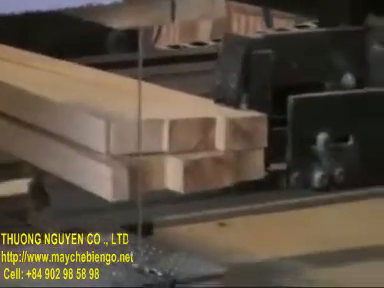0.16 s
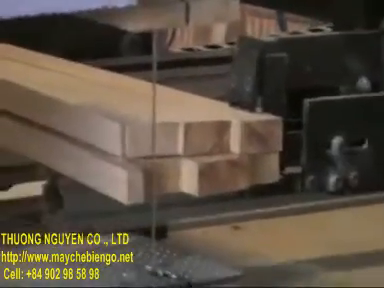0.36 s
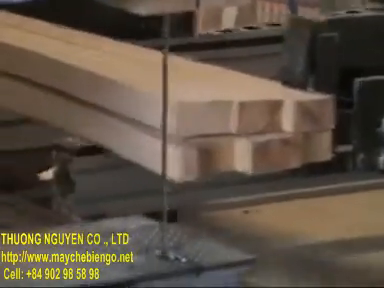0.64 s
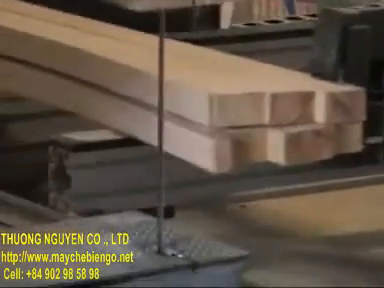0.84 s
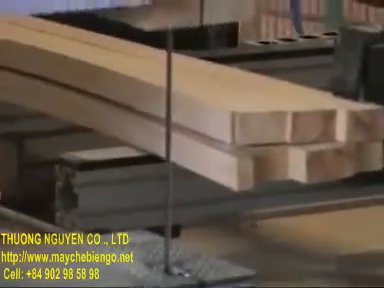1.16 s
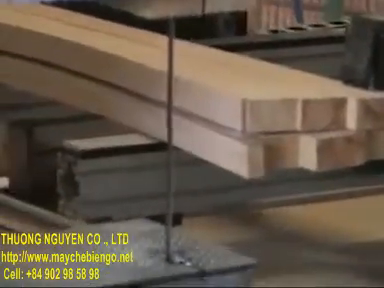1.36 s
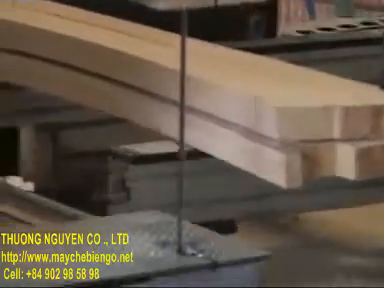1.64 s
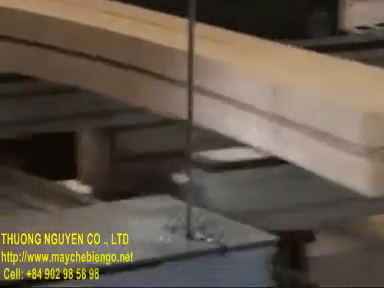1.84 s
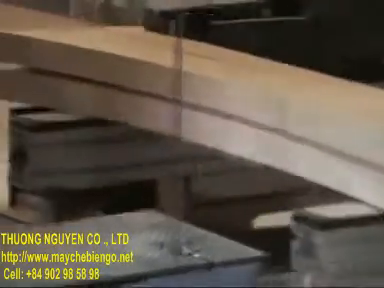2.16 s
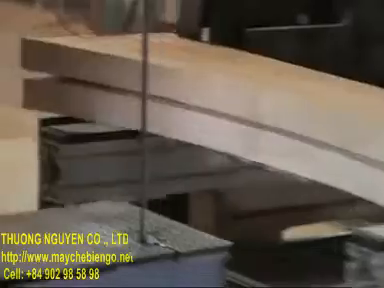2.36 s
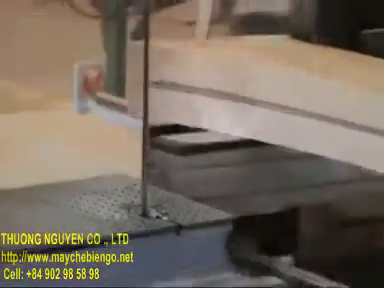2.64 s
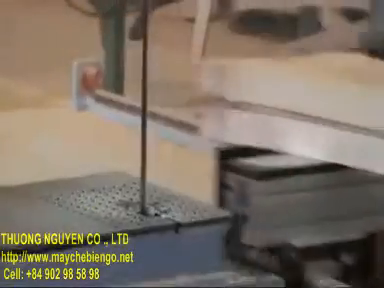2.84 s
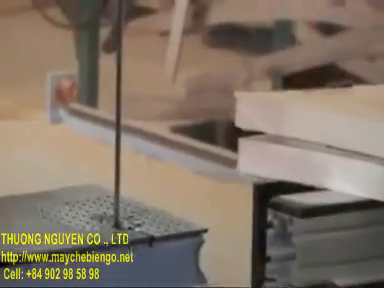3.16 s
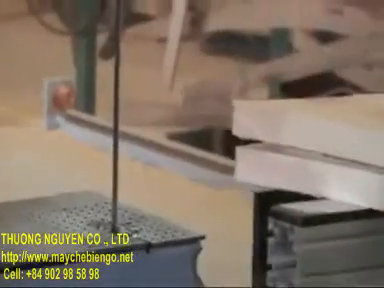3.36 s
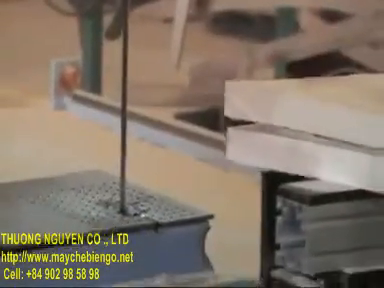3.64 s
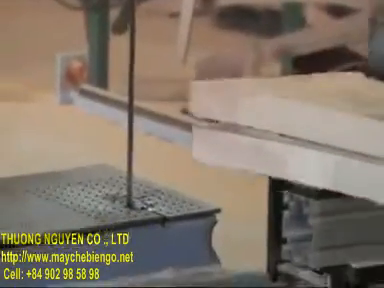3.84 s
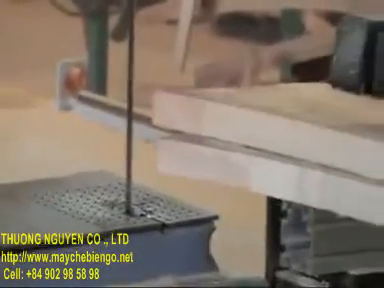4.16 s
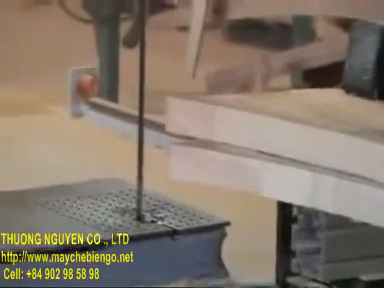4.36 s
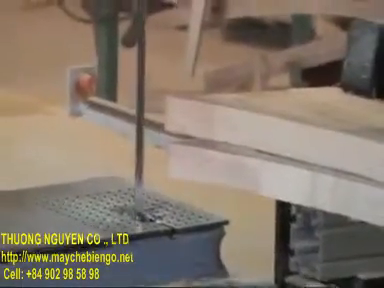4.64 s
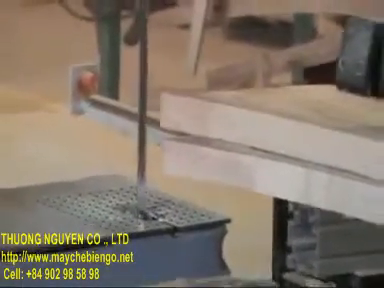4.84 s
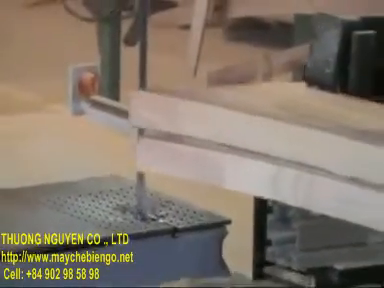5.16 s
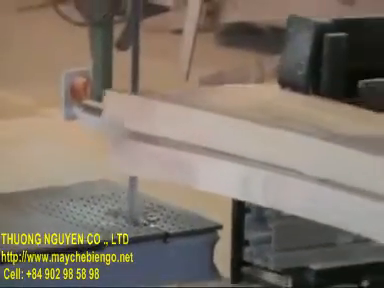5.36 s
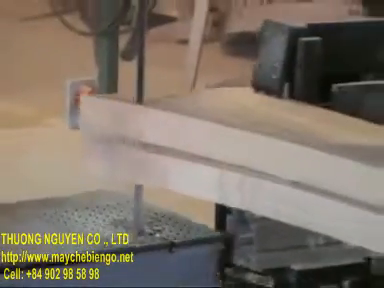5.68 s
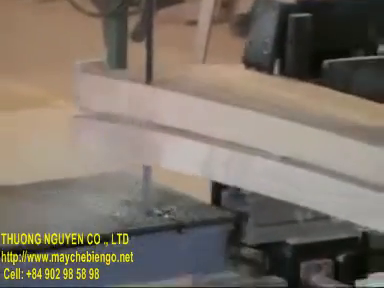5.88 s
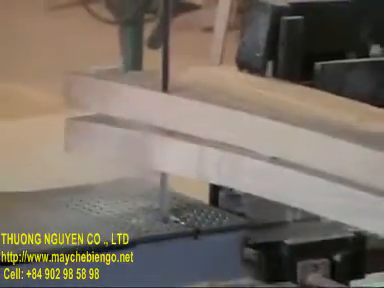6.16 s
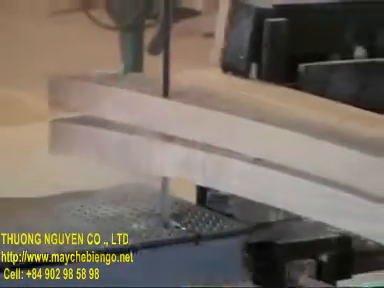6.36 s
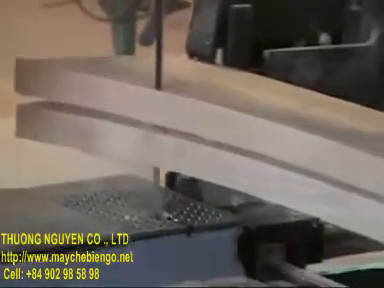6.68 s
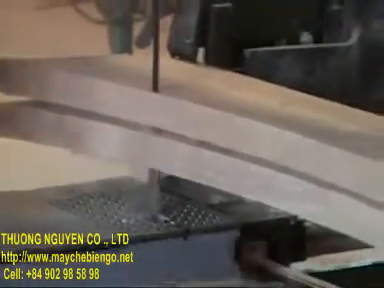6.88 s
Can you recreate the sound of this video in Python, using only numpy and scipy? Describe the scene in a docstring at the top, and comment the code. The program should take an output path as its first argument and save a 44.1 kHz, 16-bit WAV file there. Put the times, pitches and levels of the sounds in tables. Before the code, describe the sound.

A running industrial saw fills most of the time with broadband roar and hiss, faint low thuds, brief scrapes and a wavering, very high whine. Then wood meets the blade: a sudden metallic squeal, followed by a bright, gritty sawing screech that pulses irregularly and builds as the cut deepens, still going at the end. Close camera microphone in a workshop, slight stereo width in the treble, with automatic level control squeezing the background.

```python
"""A big band saw cuts a stack of boards: from 5.3 s the blade squeals, then its teeth rasp in surges, louder
as the slot deepens. The cut is built from harmonics of the tooth rate and noise pulsing at that rate.
Behind it blade, wheels and dust extraction roar as noise shaped by resonances, with rumble, hums and scrapes,
and a motor whistles with partials locked to its shaft speed, which sags and recovers.
The camera's gain control pushes the roar down as the cut grows."""
import sys
import numpy as np
from scipy import signal
from scipy.fft import rfft, irfft, next_fast_len
from scipy.io import wavfile
from scipy.ndimage import map_coordinates

SR = 44100
rng = np.random.default_rng(int(sys.argv[2]) if len(sys.argv) > 2 else 0)


def file_out(sig):
    """Save sig as 16-bit WAV at sys.argv[1]."""
    # one column per channel
    cols = np.atleast_2d(sig).T
    # limit, then scale
    lim = np.clip(cols, -1, 1)
    pcm = np.round(lim * 32767).astype(np.int16)
    wavfile.write(sys.argv[1], SR, pcm)


N = 309141  # length in samples


def amp(db):
    """Logarithmic level: decibels to linear gain."""
    return 10 ** (np.asarray(db) / 20)


def unit(x):
    """Normalisation: x scaled to rms 1."""
    return x / np.sqrt(np.mean(x ** 2) + 1e-20)


def clock():
    """Sampling: the time of every sample, in seconds."""
    return np.arange(N) / SR


def along(points, hz):
    """Logarithmic frequency scale: (f/Hz, value) points interpolated on a log axis."""
    f, v = np.transpose(points)
    return np.interp(np.log(hz + 1), np.log(f + 1), v)


def curve(rows):
    """Linear interpolation: (t/s, value) rows as one value per sample."""
    t, value = np.transpose(rows)
    return np.interp(clock(), t, value)


def wobble(rate):
    """Band-limited randomness: a smooth curve through rate random knots a second."""
    knots = rng.standard_normal(int(N * rate / SR) + 4)
    return map_coordinates(knots, [np.arange(N) * rate / SR])


def bell(x, middle, width):
    """Gaussian window: a bump of height 1 and the given full width at half height."""
    return np.exp2(-np.minimum((2 * (x - middle) / width) ** 2, 60))


def filtered(x, response):
    """Linear filtering: the spectrum of x times a response of frequency."""
    m = next_fast_len(N + SR // 4)
    return irfft(rfft(x, m) * response(np.fft.rfftfreq(m, 1 / SR)), m)[..., :N]


def turning(hz):
    """Phase accumulation: the running sum of a frequency, in radians."""
    return 2 * np.pi * np.cumsum(hz) / SR


def noise(spectrum):
    """Subtractive synthesis: two unrelated noises of one colour, falling away outside its ends."""
    closed = [(spectrum[0][0] / 2, -120), *spectrum, (spectrum[-1][0] * 2, -120)]
    return unit(filtered(rng.standard_normal((2, N)), lambda hz: amp(along(closed, hz))))


def tone(phase, rough, rate):
    """Random modulation: a tone of rms about 1, as a quadrature pair; the share rough of its power flutters."""
    rough = np.clip(rough, 0, 1)
    flutter = wobble(rate) + 1j * wobble(rate)
    z = np.exp(1j * phase) * (np.sqrt(2 * (1 - rough)) + np.sqrt(rough) * flutter)
    return np.array([z.real, z.imag])


# low spectrum of the shaking base: f/Hz, relative level/dB
BASE_SPECTRUM = [(40, -5), (62, -7), (78, -7), (100, 6), (125, -22)]
# dull thuds in the machine's base: middle t/s, level/dB
THUDS = [(0.98, -51), (1.42, -50), (1.56, -50), (2.1, -52), (3.09, -51), (3.78, -53), (4.02, -50),
         (4.22, -48), (4.85, -51), (5.0, -51), (5.13, -49)]
THUD_HZ, THUD_S = 80, 0.045


def rumble():
    """Amplitude-modulated low noise: the base shakes unevenly and now and then thuds."""
    body = noise(BASE_SPECTRUM)
    thud_gain = sum(amp(db) * bell(clock(), s, THUD_S) for s, db in THUDS)
    thuds = thud_gain * tone(turning(np.full(N, THUD_HZ)), rough=0.25, rate=32)
    shaking = unit(amp(5.5 * wobble(16)) * body)
    return amp(-64.0) * shaking + thuds


# narrow resonances of the frame and guards: f/Hz, lift/dB
FRAME_RESONANCES = [(291, 1.6), (345, 4.3), (409, 1.8), (474, 1.5), (614, 2.2), (678, 3.0), (861, 2.2),
                    (1001, 3.8), (1109, 1.4), (1227, 3.1), (1249, 2.7), (1292, 2.9), (1389, 2.1),
                    (1723, 2.9), (1873, 2.8), (2003, 1.6), (2315, 2.0), (2379, 1.7), (2455, 2.1),
                    (2519, 2.5)]


def housing(hz, width_hz, ripple_db):
    """Resonance and interference: the frame's peaks, and fine ripple from nearby walls, weaker in the treble."""
    ripple = map_coordinates(rng.standard_normal(2000), [hz / 14], mode="wrap")
    ripple = ripple / (1 + (hz / 5000) ** 2)
    peaks_db = sum(db * bell(hz, centre, width_hz) for centre, db in FRAME_RESONANCES)
    return amp(peaks_db + ripple_db * ripple)


# spectra of roar, hiss and rattle: f/Hz, relative level/dB
ROAR_SPECTRUM = [(15, -72), (25, -63), (140, -13.5), (183, -16), (224, -5.5), (283, -5.5), (316, -7.5),
                 (340, -3), (372, -5.5), (575, -4), (676, -3), (872, -1.5), (1160, -6), (1250, -6.5),
                 (1900, -11), (2470, -28), (4180, -120)]
HISS_SPECTRUM = [(940, -15.5), (1600, -4.5), (2010, -2), (2860, -2), (3090, -2.5), (3660, -3), (3940, -3),
                 (5960, -2), (7300, -4), (7870, -8), (8420, -9), (11000, -20.5), (12000, -51.5),
                 (15600, -65), (22000, -120)]
RATTLE_SPECTRUM = [(700, -13), (1200, -5.0), (1600, -2.0), (2400, -16.0), (3500, -25)]
# course of the machine's roar, before a constant lift: t/s, relative level/dB
ROAR_LEVEL = [(0.0, -24), (0.73, -23), (0.77, -28.5), (0.79, -24), (1.21, -24), (1.97, -22), (2.37, -23.5),
              (4.08, -23), (5.25, -24.5)]
# course of the guards' rattle: t/s, level/dB
RATTLE_LEVEL = [(0, -26), (.2, -29), (.45, -28), (1.0, -29), (1.2, -33.5), (1.6, -27.5), (1.9, -29.5),
                (2.08, -30), (2.45, -39), (2.9, -33), (3.1, -28), (3.5, -32), (3.8, -31.5), (4.1, -28.5),
                (4.6, -32), (5.2, -37), (5.7, -32), (7.0, -32)]
# nearly steady hums of the drive: f/Hz, level/dB
DRIVE_HUMS = [(343, -42), (477, -48), (604, -44), (619, -43.5), (678.3, -41.5), (838, -45.5), (1001, -40),
              (1226, -44), (1296, -43)]
HISS_DB = -19  # the blade running through the air


def machine():
    """Broadband noise through resonances: wheels and extraction roar, guards rattle, the blade hisses."""
    roar = unit(filtered(noise(ROAR_SPECTRUM), lambda hz: housing(hz, width_hz=16, ripple_db=1.1)))
    hiss = unit(filtered(noise(HISS_SPECTRUM), lambda hz: housing(hz, width_hz=16, ripple_db=1.3)))
    rattle = amp(curve(RATTLE_LEVEL) + 1.7 * wobble(20)) * noise(RATTLE_SPECTRUM)
    hum = sum(amp(db) * tone(turning(np.full(N, hz)), rough=0.19, rate=7) for hz, db in DRIVE_HUMS)
    roar = amp(curve(ROAR_LEVEL) + 2.0 + 0.09 * wobble(15)) * roar
    hiss = amp(HISS_DB + 0.53 * wobble(14)) * hiss
    return roar + hiss + rattle + hum


# single notes swell briefly: the frame sings on its resonances, and near 3.2 and 3.8 kHz the whistle's partials
# swell: middle t/s, f/Hz, level/dB, length/s
SWELLS = [(0.3, 872, -28, 0.45), (0.35, 1438, -32, 0.25), (0.45, 1112, -31, 0.3), (0.8, 1297, -31, 0.6),
          (0.88, 3192, -34, 0.35), (0.85, 428, -29, 0.35), (0.95, 1874, -31, 0.55), (1.08, 1728, -31, 0.4),
          (2.02, 679, -26, 0.3), (2.35, 835, -29, 0.3), (2.52, 3190, -31, 0.15), (3.122, 1386, -26, 0.16),
          (3.55, 857, -29, 0.14), (3.92, 1002, -28, 0.3), (4.3, 1232, -31, 0.25), (4.43, 3195, -29.5, 0.16),
          (5.0, 3821, -35, 0.35), (5.08, 835, -29, 0.35), (5.17, 3819, -33, 0.08), (5.52, 3822, -34, 0.25)]


def swells():
    """Phase-modulated tones in Gaussian windows: single wavering notes rise out of the roar and sink back."""
    t = clock()
    out = np.zeros(N, complex)
    for s, hz, db, length in SWELLS:
        near = np.abs(t - s) < 2 * length
        waver = .7 * wobble(40)[near]  # radians
        note = np.exp(1j * (2 * np.pi * hz * t[near] + waver))
        out[near] += amp(db) * bell(t[near], s, 1.46 * length) * note
    return np.array([out.real, out.imag])


# pitch of the whistle, which follows the shaft speed: t/s, f/Hz
WHISTLE_PITCH = [(0.38, 8075), (0.55, 8003), (1.08, 7962), (1.85, 8066), (2.13, 8072), (2.3, 8005),
                 (2.6, 7938), (3.2, 7942), (3.85, 7957), (4.2, 8005), (4.6, 7938), (5.08, 7902),
                 (5.9, 7936), (7.0, 7965)]
# course of the whistle, strongest while the shaft is dragged down: t/s, relative level/dB
WHISTLE_LEVEL = [(0.1, -35), (0.72, -31), (1.3, -32.5), (1.6, -40), (1.95, -40), (2.25, -28.5),
                 (2.75, -26.5), (3.2, -30), (3.8, -32), (4.1, -38), (4.4, -27.5), (5.1, -26.5), (5.5, -33),
                 (5.95, -29), (7.0, -33)]
# partials that turn with the whistle: share of its pitch, relative level/dB, resonance f/Hz, lift/dB
PARTIALS = [(1, 1.5, 7950, 0), (.958, -6, 7605, 4), (.768, -9, 6098, 6), (.65, -8, 5197, 11),
            (.6, -2, 4762, 2), (.568, -8, 4535, 8), (.558, -9, 4430, 8), (.4836, -7, 3820, 11.5),
            (.45, -7, 3591, 7), (.4, -6, 3199, 10)]
RESONANCE_Q = 100  # resonance frequency over the width of its lift


def motor():
    """Order tracking: a whistle and lower partials follow the shaft speed, swelling as they cross resonances."""
    pitch_hz = curve(WHISTLE_PITCH)
    phase = turning(pitch_hz)
    whistle = 0
    for share, level_db, centre, lift_db in PARTIALS:
        resonance_db = lift_db * bell(share * pitch_hz, centre, centre / RESONANCE_Q)
        whistle = whistle + amp(level_db + resonance_db) * tone(share * phase, rough=.33, rate=45)
    # nearly out of phase at the two ports: weak in the middle, strong at the sides
    mid_side_db = np.array([[-8], [-3.5]])
    return amp(curve(WHISTLE_LEVEL) + .8 * wobble(14) + mid_side_db) * whistle


# brief scrapes: middle t/s, centre f/Hz, bandwidth/Hz, level/dB, length/s
SCRAPES = [(1.68, 3334, 500, -28.5, 0.4), (2.07, 1700, 1200, -26, 0.11), (2.955, 2000, 1200, -22.5, 0.06),
           (3.08, 1500, 700, -27, 0.1), (4.09, 1600, 1300, -24.5, 0.08), (4.12, 800, 898, -28.5, 0.22),
           (4.34, 1350, 700, -29, 0.14), (5.323, 1215, 1298, -22.5, 0.073), (5.7, 1400, 1200, -27, 0.2),
           (5.79, 4500, 700, -26, 0.04), (5.82, 3680, 400, -25, 0.09), (5.952, 2700, 500, -23, 0.04),
           (5.95, 8100, 900, -26, 0.04), (6.23, 8300, 1500, -22, 0.025)]


def scrapes():
    """Friction noise: wood rubs on steel, and each rub swells in one narrow band."""
    t = clock()
    out = np.zeros(N, complex)
    for s, hz, width_hz, db, length in SCRAPES:
        grit = unit(wobble(width_hz)) + 1j * unit(wobble(width_hz))
        out += amp(db) * bell(t, s, length) * grit * np.exp(2j * np.pi * hz * t)
    return np.array([out.real, out.imag])


# the boards touch the blade, then are fed onto it at a steady speed
ENTRY_S, SLOT_OPENS_S, FEED_M_PER_S, SOUND_M_PER_S = 5.3, 5.37, .097, 343
TOOTH_HZ, ENTRY_EXTRA_HZ, SLOWING_S, SAG_HZ_PER_S = 940.2, 7.5, .045, 1.8


def tooth_rate():
    """Loading: teeth a second, slowed a little by the wood."""
    age = np.maximum(clock() - ENTRY_S, 0)
    return TOOTH_HZ + ENTRY_EXTRA_HZ * np.exp(-age / SLOWING_S) - SAG_HZ_PER_S * age


def slot_depth():
    """Uniform motion: length in metres of the slot sawn so far."""
    return FEED_M_PER_S * np.maximum(clock() - SLOT_OPENS_S, 0)


# the blade bites harder as it weaves in its slot: middle t/s, length/s, lift/dB
BITES = [(5.685, .02, 3), (5.722, .02, 2), (5.9, .022, 5.5), (5.965, .055, 3.5), (6.075, .055, 3.5),
         (6.165, .025, 3.5), (6.23, .035, 4), (6.31, .045, 4.5), (6.412, .025, 6.5), (6.485, .05, 4),
         (6.58, .035, 5), (6.635, .03, 4), (6.67, .02, 3), (6.73, .035, 3), (6.8, .03, 5), (6.86, .04, 3.5),
         (6.925, .025, 5.5), (6.97, .03, 4)]
BETWEEN_BITES_DB, FLUTTER_DB = -2.1, 1.5


def surges():
    """Amplitude modulation: lift in dB of the cut, from separate bites and a fast random flutter."""
    bites_db = sum(db * bell(clock(), s, length) for s, length, db in BITES)
    return BETWEEN_BITES_DB + bites_db + FLUTTER_DB * wobble(150)


# the weaving blade favours one harmonic, then another: middle t/s, length/s, multiple, lift/dB
FLARES = [(5.34, .26, 2, 10), (5.57, .1, 2, 5), (5.68, .08, 6, 14), (5.85, .07, 2, 6), (5.895, .05, 7, 2),
          (5.96, .08, 8, 10), (6.08, .09, 7, 5), (6.1, .08, 4, 6), (6.21, .06, 8, 7), (6.25, .07, 6, 7),
          (6.28, .1, 4, 8), (6.3, .06, 7, 6), (6.335, .06, 6, 8), (6.41, .06, 7, 5), (6.48, .16, 4, 9),
          (6.49, .09, 5, 7), (6.5, .05, 8, 8), (6.53, .09, 2, 12), (6.54, .07, 6, 7), (6.58, .09, 7, 6.5),
          (6.66, .06, 6, 7), (6.67, .07, 4, 7), (6.74, .1, 8, 6), (6.8, .07, 2, 12), (6.81, .07, 7, 4),
          (6.92, .04, 7, 4), (6.96, .05, 8, 8), (6.965, .04, 6, 5)]


def flare(multiple):
    """Selective excitation: lift in dB of one harmonic of the tooth rate."""
    return sum(db * bell(clock(), s, length) for s, length, k, db in FLARES if k == multiple)


# slots whose air rings as the boards open them: opening t/s, mode, relative level/dB, loudest f/Hz, band/Hz
SLOT_RINGS = [(5.36, 1, -22.5, 5900, 2100), (5.775, 1, -23.5, 5600, 1900), (5.72, 2, -23.5, 6500, 2200)]


def slot_ring():
    """Air-column resonance: each young slot rings roughly, its pitch sweeping down as the slot lengthens."""
    out = np.zeros((2, N))
    for s, mode, db, peak_hz, band_hz in SLOT_RINGS:
        length_m = np.maximum(FEED_M_PER_S * (clock() - s), .015)
        hz = mode * SOUND_M_PER_S / (2 * length_m)
        out += amp(db) * bell(hz, peak_hz, band_hz) * tone(turning(hz), rough=1, rate=1100)
    return amp(.5 * surges()) * out


SQUEAL_ATTACK_S, SQUEAL_RELEASE_S = 0.022, 0.1


def envelope(start, length):
    """Transient envelope: quick attack, hold, exponential release."""
    age = clock() - start
    attack = np.clip(age / SQUEAL_ATTACK_S, 0, 1)
    return attack * np.exp(-np.maximum(age - length, 0) / SQUEAL_RELEASE_S)


# squeals on the third harmonic, each with a wood rasp: start t/s, length/s, tone level/dB, rasp level/dB
SQUEALS = [(5.294, .25, -16.8, -24.5), (5.68, .18, -37, -30), (5.865, .28, -29.5, -28),
           (6.13, .14, -25.5, -29), (6.36, .06, -24, -27), (6.76, .25, -28, -32)]
# harmonics that sing throughout the cut: multiple, level/dB at entry, growth/(dB per s)
SINGING = [(2, -37, 1.5), (4, -37, 3.5), (5, -41, 6)]
SECOND_UNDER_DB = -26  # the second harmonic joins each squeal, this far below it
DEEP_M = .1  # reference slot depth


def squeal():
    """Self-excited vibration: the blade sings on low tooth-rate harmonics, loudest on the third at entry."""
    t = clock()
    tooth = turning(tooth_rate())
    singing = 0
    for k, db, growth in SINGING:
        level_db = db + growth * (t - ENTRY_S) + flare(k)
        singing = singing + amp(level_db) * tone(k * tooth, rough=.25, rate=60)
    # the squeal starts nearly clean and roughens as the slot deepens
    rough = np.interp(slot_depth(), [0, DEEP_M], [.08, .55])
    third = tone(3 * tooth, rough, rate=140)
    second = tone(2 * tooth, rough, rate=60)
    loudness = sum(amp(db) * envelope(s, length) for s, length, db, _ in SQUEALS)
    return envelope(ENTRY_S, t[-1]) * singing + loudness * (third + amp(SECOND_UNDER_DB) * second)


# higher harmonics of the tooth rate: multiple, relative level/dB, roughness 0-1
TOOTH_TONES = [(4, -17, .9), (5, -15, .9), (6, -7.5, .7), (7, -3.5, .4), (8, -10, .6), (9, -15, .8),
               (10, -20, 1), (11, -26, 1), (12, -30, 1)]
# spectra of tearing chips and of the rasped boards: f/Hz, relative level/dB
CHIP_SPECTRUM = [(3500, 5.5), (4600, -8), (5250, 2), (5600, 13.5), (6100, 13), (6500, 14.5), (6900, 12),
                 (7450, 11), (8000, 5), (8500, 7), (9100, -8), (10300, -5), (11500, -8), (12300, -31)]
RASP_SPECTRUM = [(800, -30), (1100, -9), (1900, -38), (2400, 1), (2700, 12), (2930, 12), (3200, -2),
                 (3700, -13), (4300, -31), (5200, -42)]
# course of the chip noise within the screech: t/s, relative level/dB
CHIP_LEVEL = [(5.9, -5), (6.12, -6), (6.3, -4.5)]
SCREECH_DB, SCREECH_POWER = -11.5, 0.88  # common gain at depth DEEP_M; it grows as this power of the depth
UNEVEN_TEETH = .55  # depth of the random modulation
CHIP_SURGE = 0.62  # share of the surges' dB that the chip noise follows
SLOT_ECHO = 0.13  # share of the chip noise that returns from the slot's open end


def cut():
    """Periodic impact: each tooth tears a chip, giving rough harmonics and pulsed noise that echoes in the slot."""
    depth = slot_depth()
    # the blade flutters, so all harmonics waver together
    tooth = turning(tooth_rate() * (.9985 + .003 * wobble(70)))
    surge_db = surges()
    strikes = unit(1 + 0.15 * np.cos(tooth))
    tones = 0
    for k, db, rough in TOOTH_TONES:
        gain = amp(db + flare(k) + 1.2 * wobble(25))
        tones = tones + gain * tone(k * tooth, rough, rate=130)
    # no two teeth bite alike, which spreads a rough skirt around each harmonic
    tones = tones * unit(1 + UNEVEN_TEETH * wobble(450))
    chips = strikes * noise(CHIP_SPECTRUM)
    echo_at = np.arange(N) - SR * 2 * depth / SOUND_M_PER_S
    echo = np.array([map_coordinates(channel, [echo_at]) for channel in chips])
    chips = unit(chips + SLOT_ECHO * echo)
    tearing = amp(surge_db - 8.0) * tones + amp(curve(CHIP_LEVEL) + CHIP_SURGE * surge_db) * chips
    screech = amp(SCREECH_DB) * (depth / DEEP_M) ** SCREECH_POWER * tearing
    rub = sum(amp(rasp_db) * envelope(s, length) for s, length, _, rasp_db in SQUEALS)
    return screech + rub * amp(.5 * surge_db) * strikes * noise(RASP_SPECTRUM)


def ports(pair, width, lean):
    """Mid-side stereo: a pair as two microphone ports hear it, with width and balance varying with frequency."""
    mid, side = pair[0], filtered(pair[1], lambda hz: amp(along(width, hz)))
    left_right = np.array([mid + side, mid - side])
    return filtered(left_right, lambda hz: amp(np.outer([.5, -.5], along(lean, hz))))


# stereo width of the running saw, and of the cut: f/Hz, gain of the side signal/dB
WIDTH = [(30, -8), (90, -18), (250, -23), (700, -22), (1500, -28), (2400, -15.5), (3500, -11.5),
         (5200, -9.5), (6500, -7.5), (7200, -2), (7800, 0), (8500, -1), (9200, -1), (10300, -3),
         (11700, -25)]
CUT_WIDTH = [(1500, -28), (2800, -17), (3700, -20), (5000, -12), (5600, -15), (6100, -12), (6550, -10),
             (7050, -6), (7500, -1), (8400, -2), (9400, -4), (11700, -25)]
# stereo balance of the running saw, and of the cut: f/Hz, left over right/dB
LEAN = [(2000, 0), (3600, -.5), (6300, -1), (7000, -.5), (7900, 3.3), (9000, 2.5), (11700, 0)]
CUT_LEAN = [(2000, 0), (3600, -.5), (5600, -3.5), (6600, -5.2), (7900, 2.3), (11700, 0)]


def scene():
    """Superposition: the running saw and the cut, each with its own stereo image."""
    running = machine() + rumble() + motor() + swells()
    cutting = cut() + slot_ring() + squeal() + scrapes()
    return ports(running, WIDTH, LEAN) + ports(cutting, CUT_WIDTH, CUT_LEAN)


def lagged(x, lag_s):
    """Exponential averaging: x followed with a first-order lag."""
    keep = np.exp(-1 / (lag_s * SR))
    return signal.lfilter([1 - keep], [1, -keep], x)


# the gain control listens more to the treble: f/Hz, level/dB
EMPHASIS = [(1500, 0.5), (6000, 5)]


def gain_control(x, ceiling_db, lag_s):
    """Dynamic compression: gain falls, with a lag, while the treble-weighted level is over the ceiling."""
    sensed = filtered(x, lambda hz: amp(along(EMPHASIS, hz)))
    level = np.sqrt(lagged(np.mean(sensed ** 2, axis=0), lag_s) + 1e-12)
    return x * np.minimum(1, amp(ceiling_db) / level)


TOP_HZ = 12270  # upper band limit


def record(dry):
    """Compression, saturation and band limiting: the camera rides its gain, rounds peaks and cuts the top."""
    held = gain_control(dry, ceiling_db=-13.0, lag_s=.13)
    rounded = held / (1 + np.abs(held / .8) ** 6) ** (1 / 6)
    return filtered(rounded, lambda hz: hz < TOP_HZ)


dry = scene()
out = record(dry)
file_out(out)
```